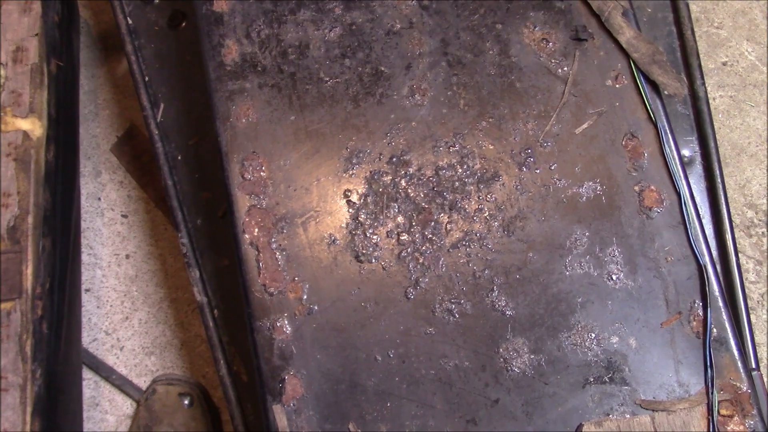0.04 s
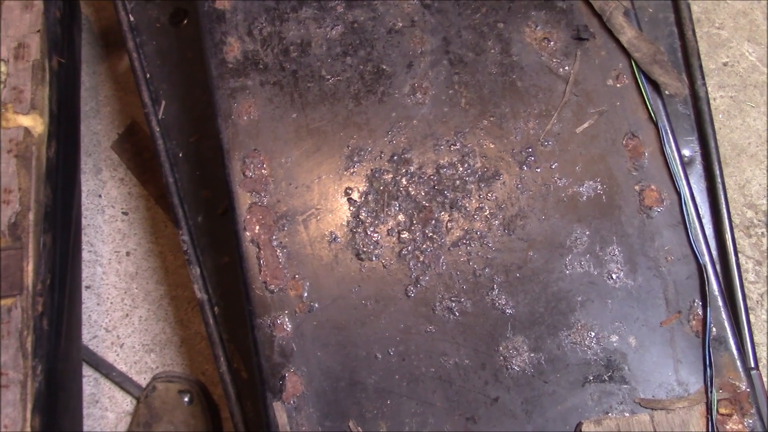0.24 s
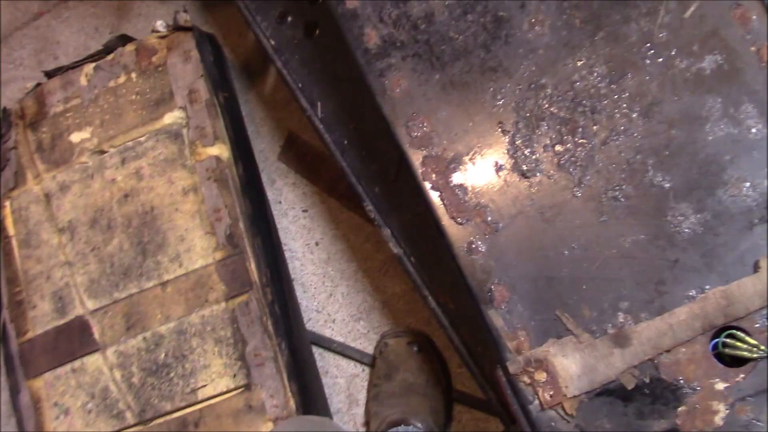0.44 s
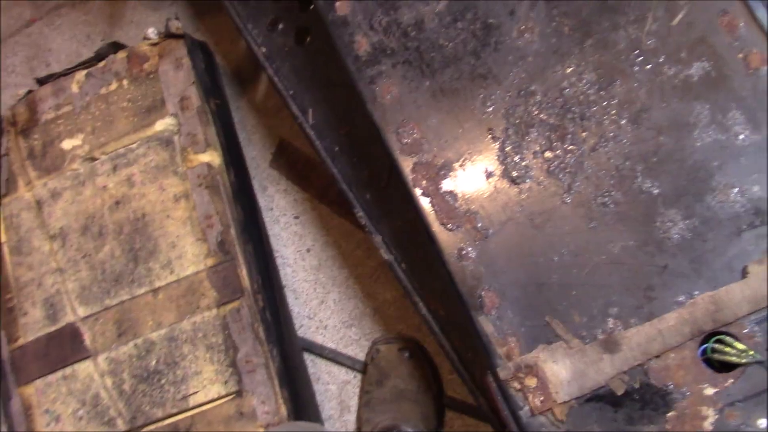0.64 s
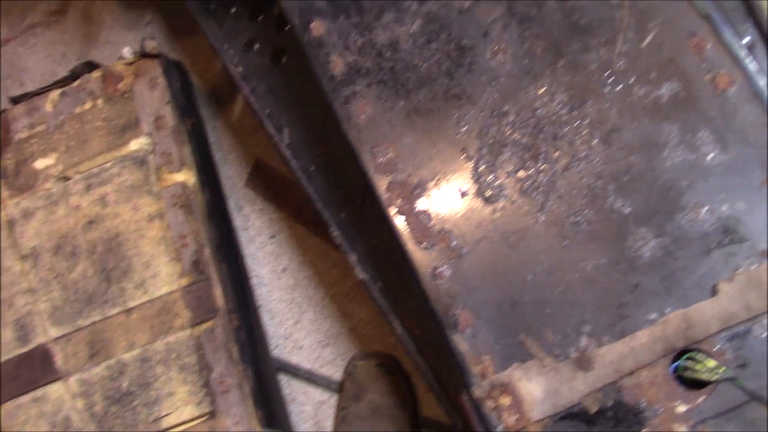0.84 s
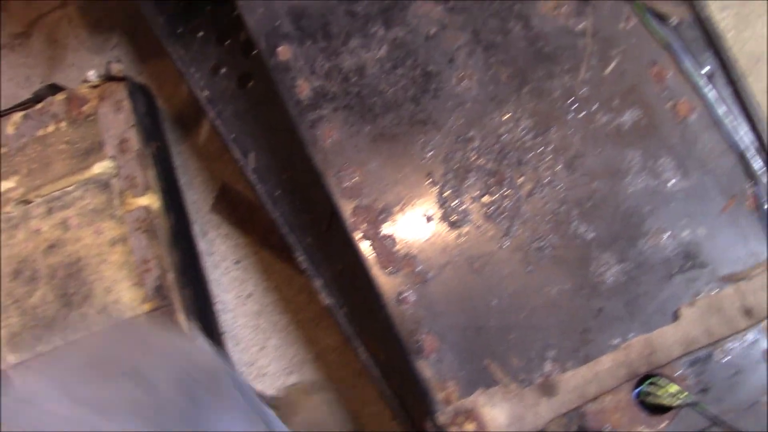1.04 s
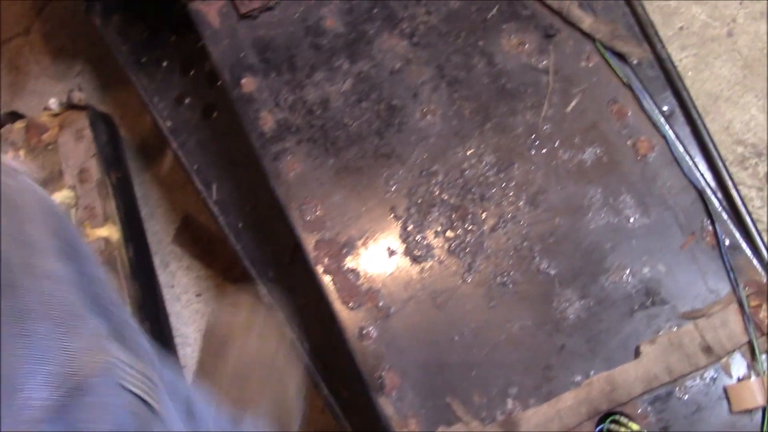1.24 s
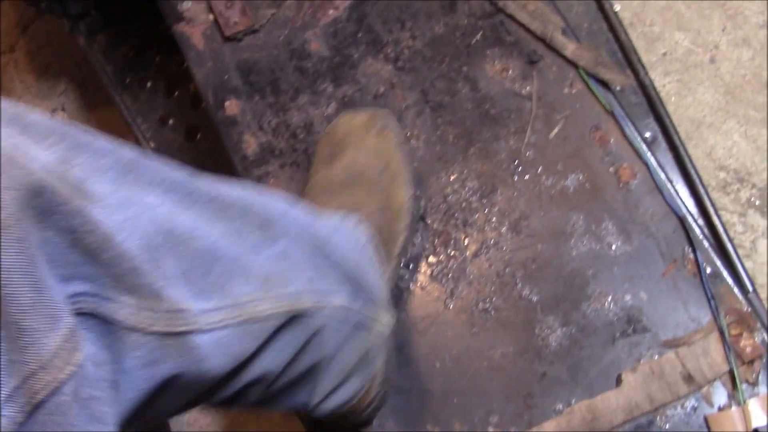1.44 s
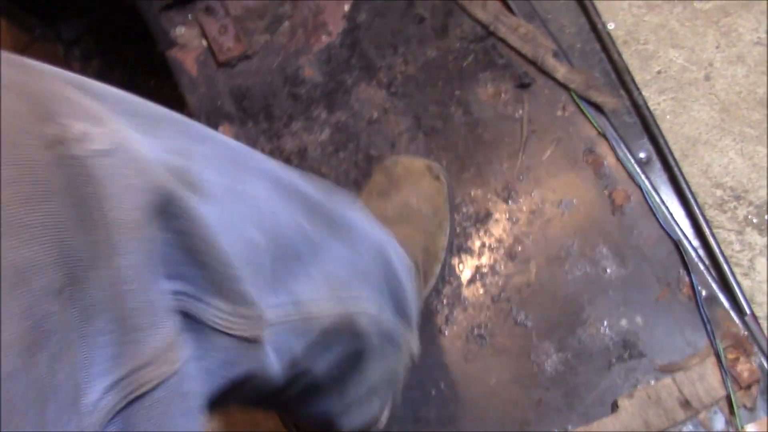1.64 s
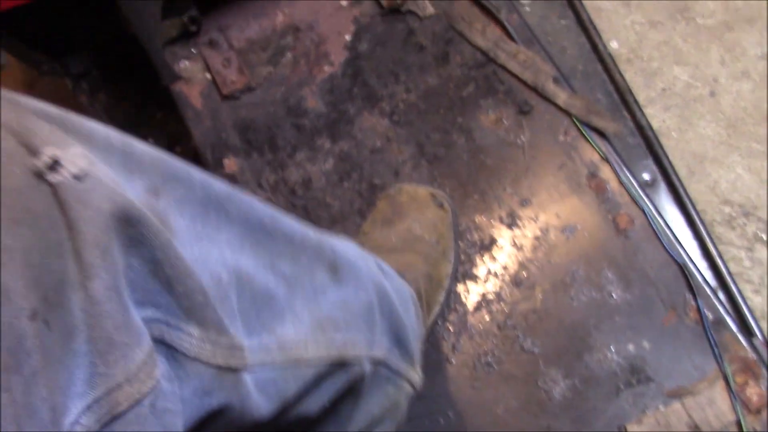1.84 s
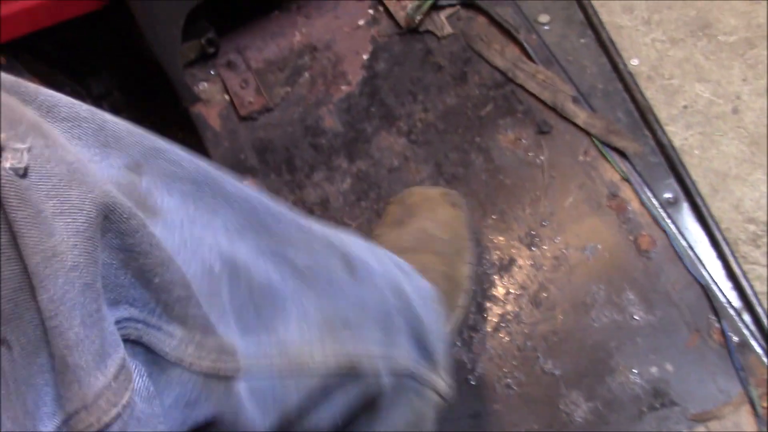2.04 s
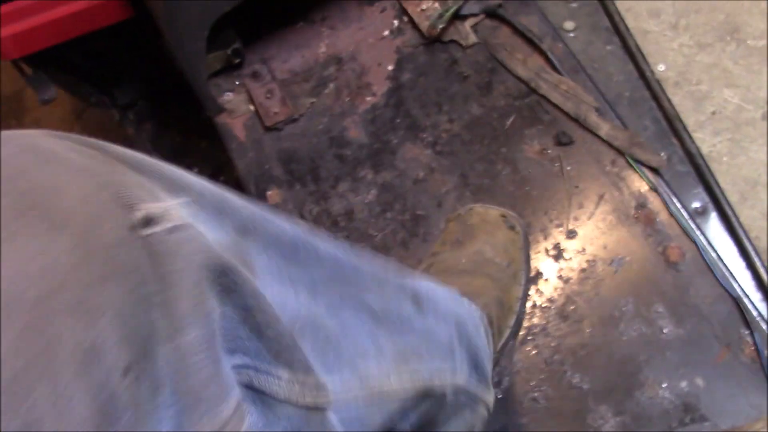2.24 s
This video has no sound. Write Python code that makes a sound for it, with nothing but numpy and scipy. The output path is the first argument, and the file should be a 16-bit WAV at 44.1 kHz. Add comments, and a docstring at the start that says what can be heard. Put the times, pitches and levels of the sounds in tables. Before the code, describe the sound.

A work boot stamps twice, half a second apart, on a rusty steel floor panel, each a short hollow boom with a light rattle. Faint denim swishing comes first. Heard close up in a workshop with a low hum.

```python
"""A work boot stamps twice on a rusty sheet-steel floor panel in a workshop.
Each stamp sets the panel booming and crashing and crushes rust; loose edges clack and small metal
bits jingle after it. Denim swishes as the leg swings and lifts, after a faint squeaky scrape.
A low hum and a short room tail lie behind; a compressor and a limiter hold the stamps flat."""
import sys
import numpy as np
from scipy import signal
from scipy.fft import rfft, irfft, next_fast_len
from scipy.io import wavfile
from scipy.ndimage import uniform_filter1d, minimum_filter1d

SR = 44100
rng = np.random.default_rng(int(sys.argv[2]) if len(sys.argv) > 2 else 0)


def digitize_waveform(pressure):
    """Quantize a signal to 16-bit integers and store it at the path in sys.argv[1].

    Rows of a 2-D input are taken as channels; values are limited to [-1, 1].
    """
    field = np.atleast_2d(pressure).T
    bounded = np.clip(field, -1, 1)
    quanta = np.round(bounded * 32767).astype(np.int16)
    wavfile.write(sys.argv[1], SR, quanta)


N = 100503
T = np.arange(N) / SR

# the boot's landings: start_s, boom_gain_db, crash_gain_db, thump_gain_db, crash_decay_scale
STAMPS = [(1.5495, -3.5, -1.5, -29, 0.77), (2.0637, 2.5, -1.5, -24, 1)]
# tone of a hard knock on the steel: frequency_hz, gain_db
CLACK_COLOUR = [(40, -54), (100, -37), (220, 14), (700, 6), (1500, 0), (2600, 4), (3900, -3.5),
                (5000, -18.5), (7000, -12), (15000, -48)]


def stamps():
    """The sole slaps, the frame thumps, and the panel rings in strong low modes and a dense crash."""
    # strong panel modes: pitch_hz, first_stamp_db, second_stamp_db, unscaled_t60_s
    panel_modes = [(146.7, -0.5, -8, 0.14), (178.3, -10.5, -9, 0.7), (237.4, -13.5, -1, 0.36),
                   (260, -1.5, -3, 0.47), (275, -8.5, -7, 0.6), (320.6, -4.5, -14, 0.36),
                   (337.5, -13.5, -40, 0.42), (366.2, -6, -20, 0.42), (480, -5, 0.5, 0.35),
                   (502, -13.5, 0, 0.37), (555.4, -21, -1, 0.2), (651, -4, -3, 0.16),
                   (692, -7.5, -14, 0.29), (815, -13, -44, 0.42), (847, -9, -13, 0.35),
                   (939, -8.5, -7.5, 0.23), (1146, -8, -17, 0.24), (1160, -7.5, -20, 0.31)]
    # tone of the crash, one curve for each landing spot: frequency_hz, gain_db
    crash_colours = [
        [(35, -51), (80, -20), (150, -11.5), (300, 1), (600, -3), (900, 0.5), (1200, -3), (2000, -14.5),
         (3200, -24.5), (5000, -35), (7000, -40), (11000, -56), (15000, -59)],
        [(35, -32), (80, -33), (150, 0), (300, 0.5), (420, -3), (600, -2.5), (800, -6.5), (1100, -7),
         (2000, -16.5), (3200, -24.5), (5000, -32), (7000, -37.5), (11000, -47), (15000, -63)],
    ]
    # decay of the dense upper modes: frequency_hz, unscaled_t60_s
    crash_decay = [(100, 0.36), (300, 0.34), (1000, 0.25), (3000, 0.32), (12000, 0.27)]
    panel_trim_db, panel_decay_scale = -1.5, 0.65
    dent_hz, thump_hz, slap_s = 313.5, 59, 0.00026
    out = np.zeros(N)
    for k, (start, boom_db, crash_db, thump_db, crash_scale) in enumerate(STAMPS):
        for m, (hz, *stamp_db, t60) in enumerate(panel_modes):
            onset = start + rng.uniform(0, 0.00606)
            bend = 0.31 * drift(per_s=30)  # the boot's shifting pressure bends each mode
            tone = (-1) ** m * np.sin(2 * np.pi * hz * (T - onset) + bend)
            gain = from_db(panel_trim_db + boom_db + stamp_db[k])
            out += gain * tone * decay(onset, t60 * panel_decay_scale)
        out += from_db(crash_db) * band_decay(noise(crash_colours[k]), start, crash_decay, crash_scale)
        age = T - start
        # the sheet gives under the sole, which quickly damps it
        dent = from_db(1) * np.sin(2 * np.pi * dent_hz * age) * decay(start, t60_s=0.031)
        # the sole's hard edge cracks on the steel
        crack = from_db(-7) * noise(CLACK_COLOUR) * decay(start, t60_s=0.023)
        contact = np.maximum(age, 0) / slap_s
        slap = from_db(9.5) * 2 * contact ** 2 * (1 - contact / 3) * np.exp(-contact)
        thump = from_db(thump_db) * np.sin(2 * np.pi * thump_hz * age) * decay(start, t60_s=0.045)
        out += dent + crack + slap + thump
    return out


def clacks():
    """The shaken panel's loose edges knock against its frame."""
    # edge knocks: start_s, level_db, t60_s
    knocks = [(1.586, -34, 0.04), (1.605, -46, 0.036), (1.632, -33.5, 0.064), (2.106, -18, 0.089),
              (2.1518, -19.5, 0.054), (2.19, -37, 0.068), (2.24, -29.5, 0.15)]
    return noise(CLACK_COLOUR) * sum(from_db(db) * decay(start, t60) for start, db, t60 in knocks)


def jingles():
    """Dying runs of tiny touches ring small metal bits."""
    # bursts of jingling: start_s, level_db
    bursts = [(1.588, -45.5), (1.63, -62), (1.686, -60.5), (1.975, -55), (2.089, -33), (2.105, -40),
              (2.152, -45), (2.187, -47), (2.234, -51)]
    # modes of the metal bits: pitch_hz, gain_db, t60_s
    bit_modes = [(6120, 5, 0.0071), (6340, -3.5, .012), (9600, -1, 0.0045), (10650, 0, 0.017),
                 (11100, -14, 0.0068), (12250, -4, 0.021), (12950, -23, .012)]
    shimmer = resonances(ticks(per_s=3000), bit_modes)
    return shimmer * sum(from_db(db) * decay(start, t60_s=0.099) for start, db in bursts)


def rust_crunch():
    """Rust flakes crack under the sole at each stamp."""
    band = signal.butter(2, [2200, 7500], "band", fs=SR, output="sos")
    grains = rms_one(signal.sosfilt(band, ticks(per_s=1800) + 1e-18))
    return from_db(-40.5) * grains * sum(decay(start, t60_s=0.33) for start, *_ in STAMPS)


def weight_shift():
    """The panel flexes and grit snaps as the weight shifts."""
    # swells of flexing steel: peak_s, half_width_s, level_db
    swells = [(0.956, 0.018, -62), (1.918, 0.025, -37), (1.99, 0.065, -48.5)]
    # hollow tone of the flex: frequency_hz, gain_db
    flex_colour = [(60, -31), (130, -14), (180, -3.5), (280, -7.5), (350, 3.5), (430, -7.5), (700, -13.5),
                   (1300, -19), (3000, -35), (10000, -63)]
    # grit snapping under the sole: start_s, level_db
    snaps = [(1.82, -62), (1.867, -51), (2.018, -42.5)]
    # bright tone of the grit: frequency_hz, gain_db
    snap_colour = [(500, -8), (3500, -5), (7000, -4), (15000, -34)]
    flexing = sum(from_db(db) / (1 + ((T - peak) / width) ** 2) for peak, width, db in swells)
    snapping = sum(from_db(db) * decay(start, t60_s=0.014) for start, db in snaps)
    return noise(flex_colour) * flexing + noise(snap_colour) * snapping


def clothes():
    """Denim rubs and swishes over a duller scuffing as the leg moves."""
    # swell of the denim: time_s, level_db
    denim_levels = [(0, -74), (.75, -71), (.9, -67), (1.04, -63), (1.12, -53.5), (1.21, -51), (1.28, -54),
                    (1.35, -62), (1.42, -68), (1.53, -63), (1.85, -64.5), (1.885, -53.5), (1.95, -58),
                    (2.05, -56.5), (2.28, -57)]
    # airy tone of the denim: frequency_hz, gain_db
    denim_colour = [(200, -33), (700, -3), (1500, 3), (3000, 3.5), (4800, -4), (7000, -3), (10500, -12.5),
                    (15000, -27)]
    # swell of the scuffing: time_s, level_db
    scuff_levels = [(0, -62.5), (.2, -54), (.33, -56.5), (.45, -64), (.75, -62), (.96, -54.5), (1.1, -57),
                    (1.28, -58), (1.45, -65), (2.28, -54)]
    # soft tone of the scuffing: frequency_hz, gain_db
    scuff_colour = [(100, -44), (300, 6), (900, -1), (1600, -9), (2500, -21), (8000, -39)]
    swish = fader(denim_levels) * noise(denim_colour)
    roughness = from_db(0.5 * drift(per_s=82))
    return swish * roughness + fader(scuff_levels) * noise(scuff_colour)


def squeak(peak_s=0.28, width_s=0.079, level_db=-62.5):
    """Rubbing excites a few narrow resonances in one faint scrape."""
    # squeaking resonances: pitch_hz, gain_db, t60_s
    modes = [(1470, 8, 0.076), (2040, -2, .04), (5650, -17, 0.049)]
    swell = np.exp(-((T - peak_s) / width_s) ** 2 / 2)
    return from_db(level_db) * resonances(rng.standard_normal(N), modes) * swell


def room_tail(x, wet_db=-24):
    """The workshop's diffuse reverb, longest in the bass."""
    # reverb time: frequency_hz, t60_s
    room_decay = [(100, 1), (500, 0.54), (2000, 0.28), (10000, 0.45)]
    tail = band_decay(rng.standard_normal(N), 0.02, room_decay)
    return from_db(wet_db) * signal.fftconvolve(x, tail / np.sqrt(np.sum(tail ** 2)))[:N]


def room_tone(air_db=-54, waver=0.68):
    """Workshop air and a wavering machine hum."""
    # hum partials: pitch_hz, level_db
    partials = [(113, -68.5), (225, -57), (334, -62.5)]
    # dark tone of the air: frequency_hz, gain_db
    air_colour = [(30, -18), (70, -6), (115, -14.5), (160, -1.5), (300, -1.5), (600, -6.5), (1200, -17.5),
                  (2500, -28), (6000, -38.5), (15000, -60.5)]
    hum = 0
    for hz, db in partials:
        gain = from_db(db) * np.sqrt(2) * (1 + waver * drift(per_s=9.84))
        hum += gain * np.sin(2 * np.pi * hz * T + 2 * waver * drift(per_s=9.06))
    return from_db(air_db) * noise(air_colour) + hum


def from_db(db):
    """Decibels to gain."""
    return 10 ** (np.asarray(db) / 20)


def rms_one(x):
    """Scale to unit rms."""
    return x / np.sqrt(np.mean(x ** 2) + 1e-20)


def fader(curve):
    """Gain over time from (time_s, level_db) points."""
    return from_db(np.interp(T, *np.transpose(curve)))


def decay(start_s, t60_s, contact_s=0.0003):
    """A rise as quick as the contact, then an exponential fall."""
    age = np.maximum(T - start_s, 0)
    rise = 1 - np.exp(-np.minimum(age / contact_s, 6) ** 2)
    return rise * from_db(-60 * np.minimum(age / t60_s, 4))


def drift(per_s):
    """A random wander at unit rms."""
    return rms_one(np.interp(T * per_s, np.arange(200), rng.standard_normal(200)))


def ticks(per_s):
    """Random clicks of random size."""
    return (rng.random(N) < per_s / SR) * rng.standard_normal(N)


def noise(colour):
    """Steady coloured noise at unit rms, rolled off below 20 Hz."""
    size = next_fast_len(N, real=True)
    hz = np.maximum(np.fft.rfftfreq(size, 1 / SR), 1)
    points_hz, points_db = np.transpose(colour)
    gain = from_db(np.interp(np.log(hz), np.log(points_hz), points_db)) * hz / (hz + 20)
    return rms_one(irfft(rfft(rng.standard_normal(size)) * gain)[:N])


def band_decay(x, start_s, bands, scale=1):
    """Split x into overlapping bands that each die at their own rate."""
    size = next_fast_len(N, real=True)
    hz = np.maximum(np.fft.rfftfreq(size, 1 / SR), 1)
    spectrum = rfft(x, size)
    centres, t60s = np.transpose(bands)
    out = 0
    for share, t60 in zip(np.eye(len(t60s)), t60s):
        weight = np.interp(np.log(hz), np.log(centres), share)
        out += irfft(spectrum * weight, size)[:N] * decay(start_s, t60 * scale)
    return out


def resonances(x, modes):
    """Ring parallel resonators with x; unit rms."""
    out = 0
    for hz, db, t60 in modes:
        radius, angle = from_db(-60 / (t60 * SR)), 2 * np.pi * hz / SR
        feedback = [1, -2 * radius * np.cos(angle), radius ** 2]
        out += from_db(db) * rms_one(signal.lfilter([0, np.sin(angle)], feedback, x + 1e-18))
    return rms_one(out)


def excess_db(x, threshold_db, release_db_per_s):
    """How far the peaks exceed a threshold, let go at a steady rate."""
    over = np.maximum(20 * np.log10(np.abs(x) + 1e-9) - threshold_db, 0)
    return np.maximum.accumulate(over + release_db_per_s * T) - release_db_per_s * T


def scene():
    """Boot and panel in the room, with clothes, squeak and room tone."""
    floor = stamps() + clacks() + jingles() + rust_crunch() + weight_shift()
    return (floor + room_tail(floor) + clothes() + squeak() + room_tone())[None]


def record(dry):
    """A compressor ducks each stamp, the bass is cut, a fast limiter catches peaks, the top is cut."""
    compress_attack_s, limit_attack_s = 0.0095, 0.0008
    low_cut_hz, high_cut_hz = 110, 15600
    lag = np.exp(-1 / (compress_attack_s * SR))
    duck_db = excess_db(dry[0], threshold_db=-5, release_db_per_s=255)
    x = dry[0] * from_db(-signal.lfilter([1 - lag], [1, -lag], duck_db))
    x = signal.sosfilt(signal.butter(2, low_cut_hz, "high", fs=SR, output="sos"), x)
    span = int(limit_attack_s * SR)
    limit_db = minimum_filter1d(-excess_db(x, threshold_db=-6, release_db_per_s=1200), 2 * span)
    x = x * from_db(uniform_filter1d(uniform_filter1d(limit_db, span), span))
    return signal.sosfilt(signal.ellip(10, .1, 80, high_cut_hz, fs=SR, output="sos"), x)[None]


dry = scene()
out = record(dry)
digitize_waveform(out)
```